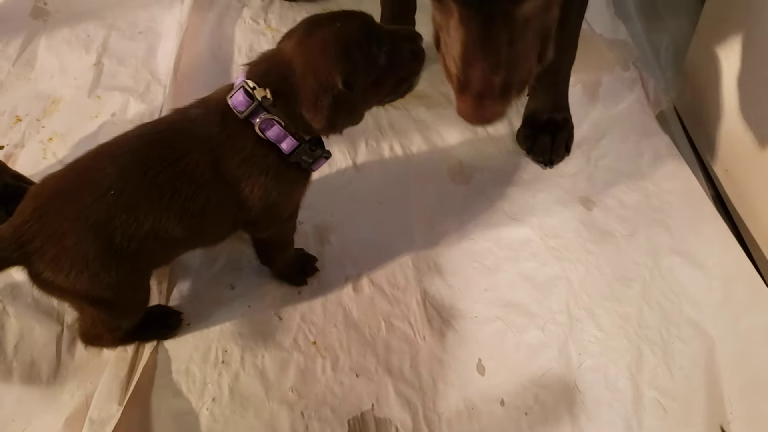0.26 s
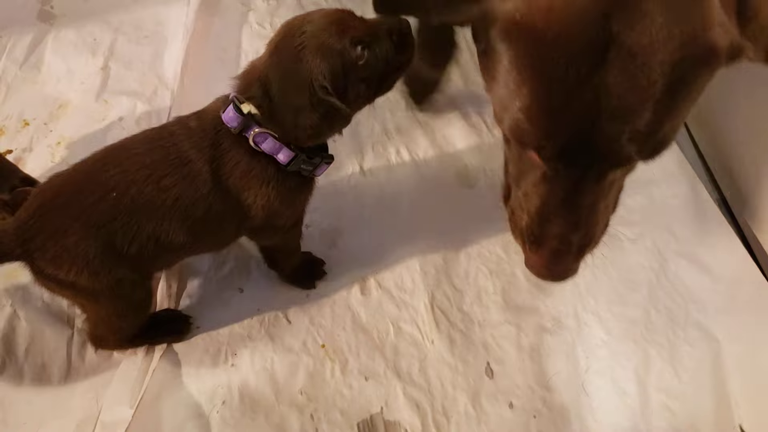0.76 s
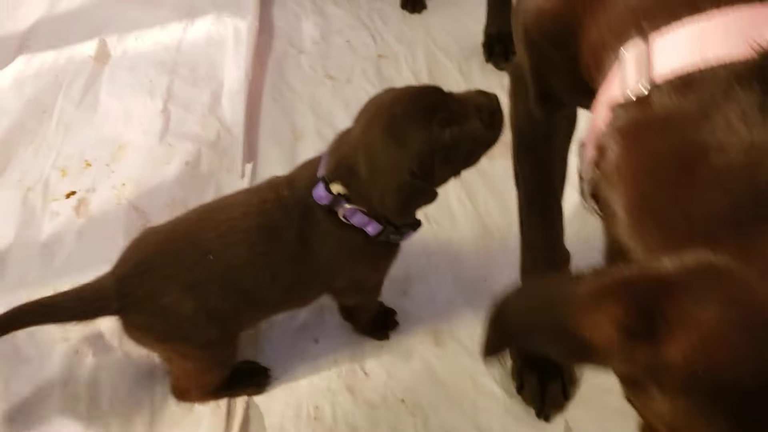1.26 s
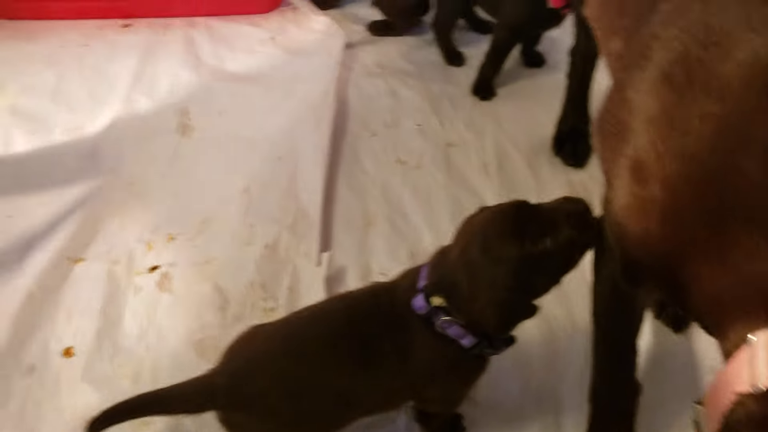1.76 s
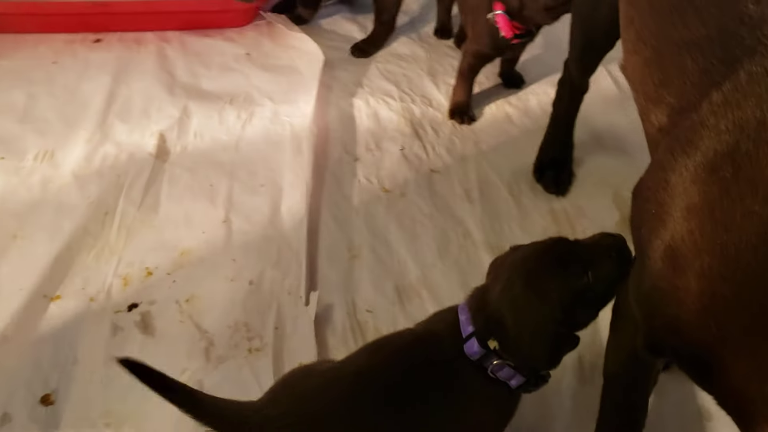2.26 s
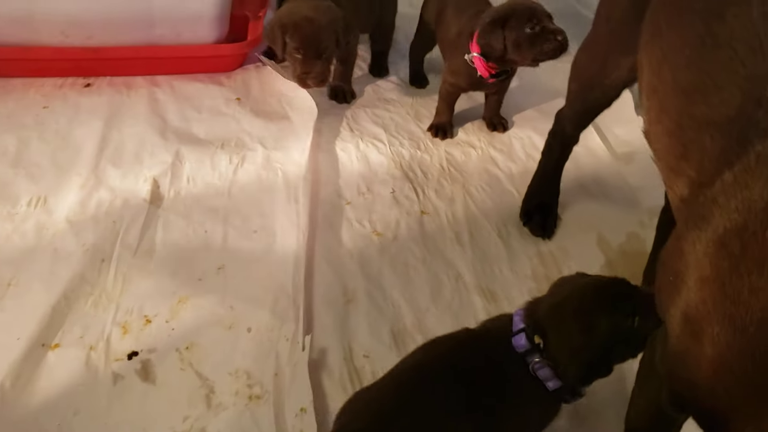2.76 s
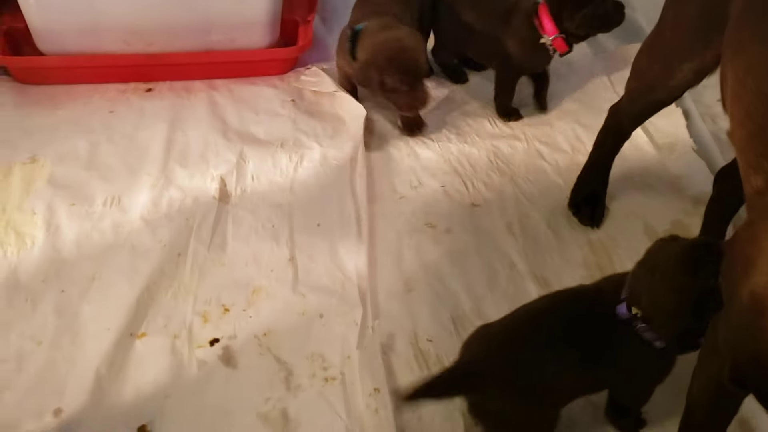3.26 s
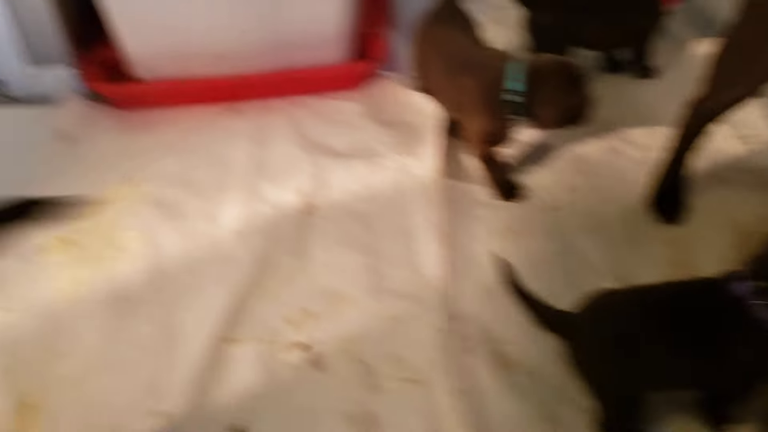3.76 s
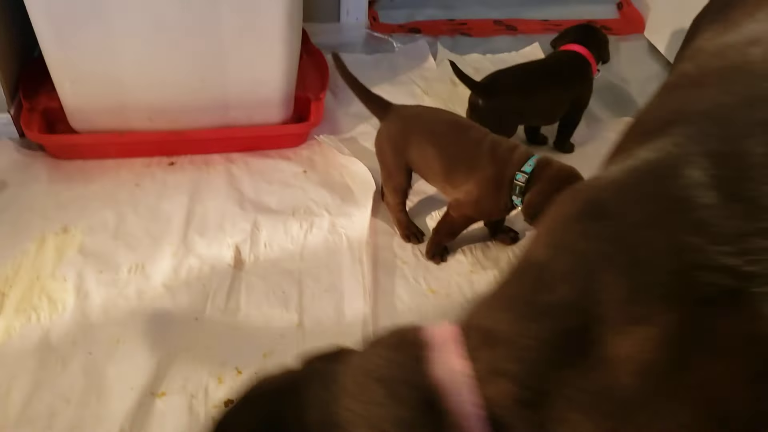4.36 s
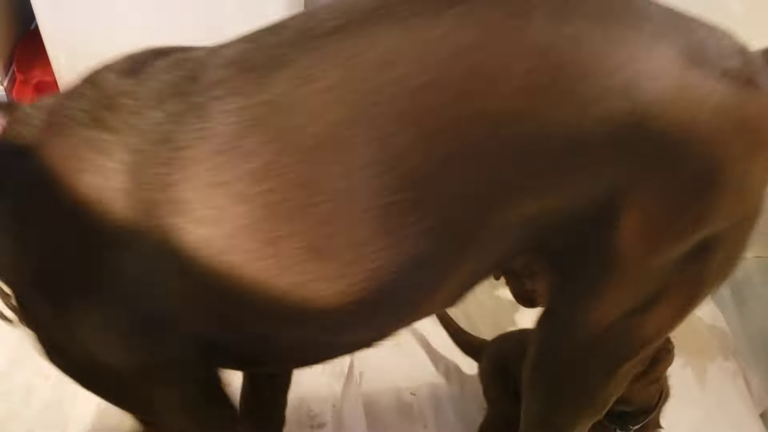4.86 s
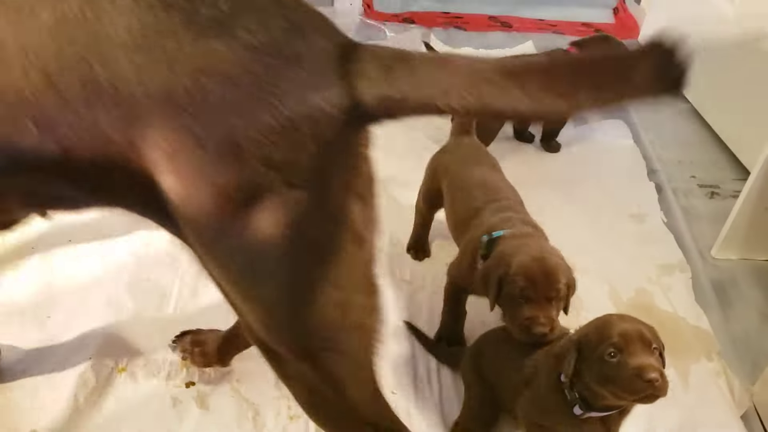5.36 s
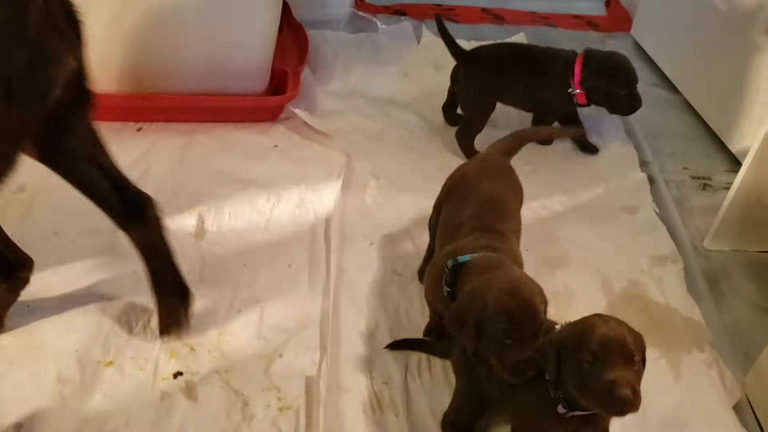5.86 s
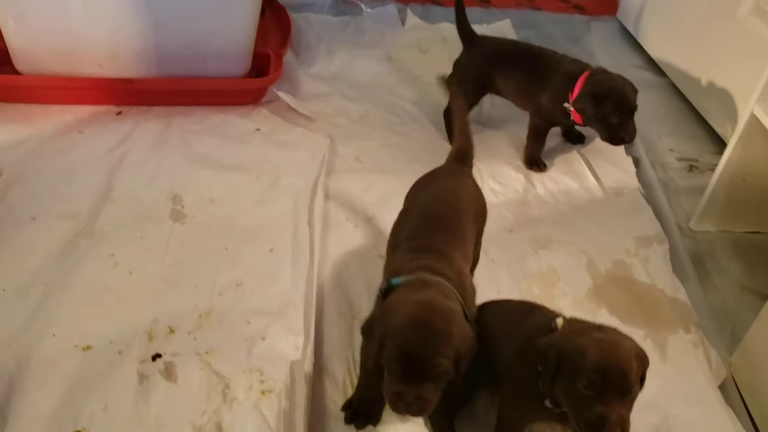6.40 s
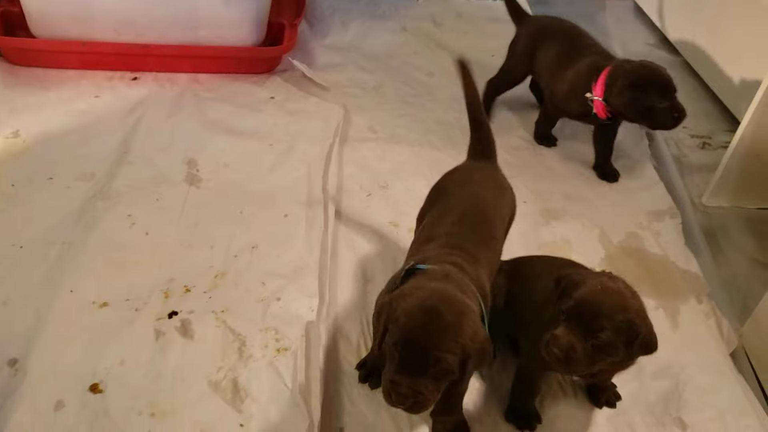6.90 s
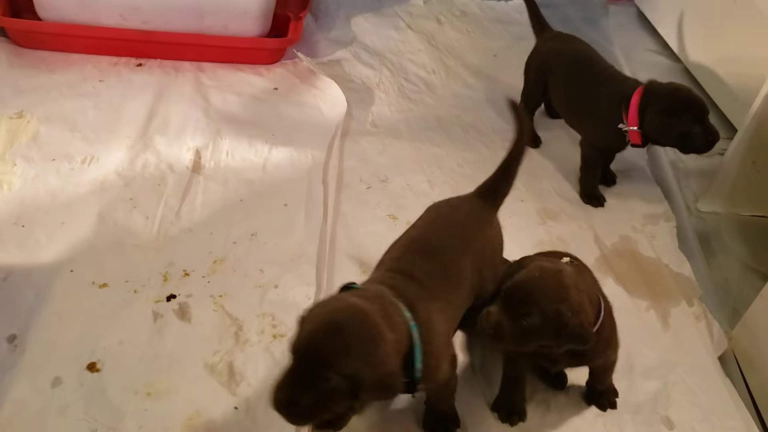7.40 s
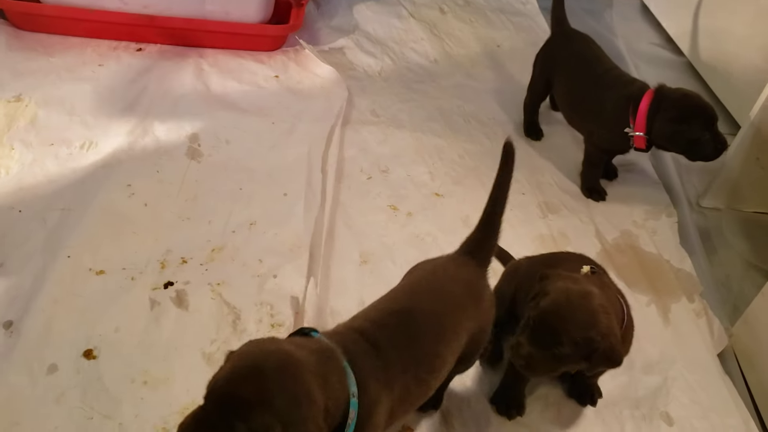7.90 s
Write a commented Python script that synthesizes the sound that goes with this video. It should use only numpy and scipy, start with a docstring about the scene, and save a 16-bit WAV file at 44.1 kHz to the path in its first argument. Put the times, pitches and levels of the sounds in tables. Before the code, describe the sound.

A dog and her puppies shuffle about on paper sheets in a small room, heard from close above. Their paws patter and slide in uneven bursts of crackle, with sharp crease snaps and soft floor thuds. The pups give a few faint, brief squeaks. Fingers bump the hand-held microphone on the right around the middle and again near the end, over faint hiss and low rumble.

```python
"""A small room, where a dog and her puppies shuffle about on paper sheets, heard from close above.
Under their paws the paper buckles into dense crackle, single creases snap and ring, hollow spots
resonate and the floor thuds softly. The pups give a few faint squeaks. Fingers bump a hand-held
phone near its right microphone. Short reverberation, faint hiss and a low rumble lie behind."""
import sys
import numpy as np
from scipy import signal
from scipy.fft import rfft, irfft, next_fast_len
from scipy.io import wavfile

SR = 44100
rng = np.random.default_rng(int(sys.argv[2]) if len(sys.argv) > 2 else 0)


def generate_wav(signal):
    """Clip the signal to [-1, 1] and save it as 16-bit WAV at the path in sys.argv[1]."""
    frames = np.transpose(np.atleast_2d(signal))
    scaled = np.clip(frames, -1, 1) * 32767
    pcm = np.round(scaled).astype(np.int16)
    wavfile.write(sys.argv[1], SR, pcm)


N = 358974
T = np.arange(N) / SR
TOP_HZ = 16050  # upper band limit


# Spectrum of crackling paper: f/Hz, level/dB
PAPER_SPECTRUM = [(200, -19.5), (700, -20.5), (1400, -8.5), (2400, -0.5), (4200, 0), (6800, -3),
                  (8800, -10), (10500, -5), (12500, -2), (16000, -10)]
# Spectrum of a rubbing pad: f/Hz, level/dB
PAD_SPECTRUM = [(80, -6), (200, -3), (680, -1), (1300, 1.5), (2200, -1.5), (4000, -13.5), (9000, -19.5)]
def paws(rub_db=3.0, crush_db=-38.5, fine_hz=7500):
    """Buckling and friction: a sliding paw crushes many creases at once while its pad rubs the floor."""
    pressure, rub, fine = treading()
    crush = pressure / np.hypot(pressure, undb(crush_db))  # above crush_db the crackle turns dense
    lowpass, highpass = (signal.butter(3, fine_hz, kind, fs=SR, output="sos") for kind in ("low", "high"))
    coarse_creases = signal.sosfilt(lowpass, pressure * creases(crush))
    fine_creases = signal.sosfilt(highpass, fine * creases(crush))
    paper = colour(coarse_creases + fine_creases, PAPER_SPECTRUM)
    pads = unit(colour(crackle(per_s=1000, spread_db=3.0, decay_s=0.0062), PAD_SPECTRUM))
    return patchy(paper + undb(rub_db) * rub * pads)


# Paws landing and sliding: t/s, rise/s, slide/s, crackle/dB, rub/dB re crackle, treble/dB re crackle
PAW_STEPS = [(0.0, 0.00042, 0.0025, -38, -11, -4), (0.395, 0.0039, 0.039, -44.5, -32, 1),
             (0.549, 0.0052, 0.021, -46, -37, 4.5), (0.7502, 0.012, 0.022, -29, -22, -2),
             (1.028, 0.01, 0.015, -30, -17.5, -1.5), (1.219, .003, 0.026, -48.5, -10.5, 6),
             (1.408, 0.016, 0.029, -43, -6, 3.5), (1.506, 0.048, 0.02, -32, -10.5, -3),
             (1.94, 0.051, 0.008, -35, -17.5, 2.5), (2.018, 0.0037, 0.025, -40, -9, -3),
             (2.221, 0.0069, 0.037, -43, -15.5, -2), (2.266, 0.0045, 0.041, -41.5, -10.5, -4),
             (2.346, 0.0039, 0.023, -40.5, -9.5, 3.5), (2.465, .003, 0.044, -45.5, -15, 0.5),
             (2.753, 0.048, 0.014, -39, -9, 1), (2.924, 0.014, 0.012, -41, -10.5, 5),
             (3.111, 0.0015, 0.004, -41, -14, 2.5), (3.27, .008, 0.023, -45.5, -11, 2),
             (3.33, 0.038, 0.08, -45, -8, 3), (3.537, 0.04, 0.023, -33, -10, 3.5),
             (3.872, 0.00092, 0.0064, -45, 0, -14), (4.125, 0.051, 0.057, -41.5, -7, 0.5),
             (4.563, 0.019, 0.071, -40.5, -7.5, 1), (4.677, 0.0047, 0.024, -32, -12.5, -6),
             (4.818, 0.0043, 0.016, -41.5, -12, 2.5), (5.005, 0.012, 0.018, -46, -1, 3),
             (5.087, 0.0042, 0.013, -46.5, -8, 3), (5.195, 0.006, 0.013, -45, -9.5, -1),
             (5.343, 0.029, 0.039, -30.5, -13.5, -3), (5.409, 0.0092, 0.0058, -24, -11, -1),
             (5.549, 0.014, 0.019, -37.5, -10.5, 0.5), (5.6877, .001, 0.0054, -33, -23, -5),
             (5.762, 0.02, 0.027, -43, -8, 1), (5.928, 0.0042, 0.077, -44.5, -11, -11),
             (6.054, 0.014, 0.027, -40.5, -7.5, -3), (6.135, 0.0075, 0.017, -47, -0.5, -2),
             (6.251, 0.003, 0.076, -40.5, -9, 3), (6.368, 0.0056, 0.041, -35, -10, 0),
             (6.433, 0.019, .008, -34.5, -10.5, 0.5), (6.65, 0.0007, 0.0044, -36.5, -3.5, -2),
             (6.666, 0.0045, 0.038, -34.5, -9.5, -2.5), (6.755, 0.038, 0.095, -44, -6.5, 3),
             (6.993, .002, 0.019, -44, -3.5, 8.5), (7.106, 0.026, .11, -43, -6, -3),
             (7.339, 0.003, 0.028, -37.5, -10.5, -12), (7.592, 0.013, 0.091, -43.5, -9, -4.5),
             (7.678, 0.076, 0.047, -35.5, -9, -4), (8.037, .01, 0.062, -39.5, -7.5, -7)]
# Rustle of the litter fidgeting between steps: t/s, level/dB
FIDGET_LEVELS = [(0, -55), (.35, -60), (.47, -50), (.63, -60.5), (.69, -51.5), (.9, -47), (1.12, -48.5),
                 (1.29, -57), (1.72, -52.5), (2.18, -58.5), (2.72, -47.5), (3.0, -43.5), (3.16, -57),
                 (3.22, -53), (4.3, -46), (4.52, -53), (4.8, -45.5), (5.24, -48), (5.31, -54.5), (5.5, -47),
                 (6.62, -52.5), (7.28, -44.5), (7.41, -53), (7.96, -54), (8.02, -41.5)]
def treading(fidget_rub_db=-9.5, fidget_fine_db=-0.5, flicker_db=3):
    """Incoherent sources add in power: steps and fidgeting set the crackle, rub and treble amplitudes."""
    fidget = undb(curve(FIDGET_LEVELS) + flicker_db * wander(per_s=30))
    power = np.outer(undb([0, fidget_rub_db, fidget_fine_db]), fidget) ** 2
    for s, rise_s, slide_s, db, rub_db, fine_db in PAW_STEPS:
        envelope = undb(db) * step(rise_s, slide_s)
        add(power, s, np.outer(undb([0, rub_db, fine_db]), envelope) ** 2)
    return np.sqrt(power)


def step(rise_s, slide_s, release_s=0.013, settle_s=0.19, settle_db=-21.5):
    """Two-stage decay: crackle dies fast once the paw stops, but a little lingers as the sheet settles."""
    t = T[:SR]
    stopped = np.maximum(t - rise_s - slide_s, 0)
    lingering = undb(settle_db)
    fade = (1 - lingering) * np.exp(-stopped / release_s) + lingering * np.exp(-stopped / settle_s)
    return np.sin(np.pi / 2 * np.minimum(t / rise_s, 1)) * fade


def creases(crush, crinkle_db=-5.5):
    """Buckling rate grows with load: sparse with lone crinkles at crush 0, dense at crush 1."""
    crinkles = undb(crinkle_db) * crackle(per_s=70, spread_db=3.5, decay_s=.003)
    sparse = crackle(per_s=1500, spread_db=3.8, decay_s=.0014)
    dense = crackle(per_s=5000, spread_db=2.7, decay_s=.001)
    return np.sqrt(1 - crush ** 2) * (crinkles + sparse) + crush * dense


def crackle(per_s, spread_db, decay_s):
    """Shot noise: tiny bucklings of very uneven size arrive at random, each a short puff; rms 1."""
    sizes = undb(spread_db * np.minimum(rng.standard_exponential(N), 4))
    clicks = (rng.random(N) < per_s / SR) * sizes
    energy = signal.lfilter([1], [1, -np.exp(-2 / (decay_s * SR))], clicks ** 2)
    return unit(np.sqrt(energy) * stereo_noise())


def patchy(x, depth_db=1.5, per_s=25, count=26):
    """Size sets resonance: each new patch under a paw differs, so narrow bands swell independently."""
    size = next_fast_len(N, real=True)
    f = np.fft.rfftfreq(size, 1 / SR)
    band_index = np.interp(np.log(f + 1), np.log([300, 16000]), [0, count - 1])
    spectrum = rfft(x, size)
    triangles = (np.maximum(1 - np.abs(band_index - k), 0) for k in range(count))
    bands = (irfft(spectrum * triangle, size)[:, :N] for triangle in triangles)
    return sum(band * undb(depth_db * wander(per_s)) for band in bands)


# Single creases snapping and claws ticking: t/s, level/dB, ring f/Hz
CREASE_SNAPS = [(0.297, -36, 4600), (0.3948, -27, 10300), (0.5649, -31.5, 5260), (1.106, -26, 5130),
                (1.1418, -27.5, 12200), (1.226, -32.5, 12350), (1.438, -29, 4380), (1.9375, -29, 12700),
                (2.2227, -23, 10750), (2.2695, -28, 2980), (2.291, -26, 4650), (2.47, -28, 4870),
                (2.595, -27.5, 12100), (2.658, -30.5, 6850), (2.851, -22.5, 11500), (3.006, -46, 4800),
                (3.0519, -20, 11800), (3.19, -21, 4500), (3.282, -29, 11800), (3.547, -21.5, 12100),
                (3.873, -24, 2300), (4.0097, -26, 4600), (4.685, -21, 3430), (5.3698, -19, 3080),
                (5.703, -31, 4900), (6.255, -27, 4970), (6.378, -24.5, 12200), (6.672, -19.5, 12870),
                (6.845, -26, 11800), (7.000, -27, 6000), (7.185, -26.5, 13000), (7.239, -31, 4540),
                (7.2754, -17.5, 11000), (7.51, -30.5, 4070), (7.681, -30, 5000), (7.7, -19, 13600),
                (7.742, -23, 4000), (7.885, -35.5, 4500), (7.9793, -30, 4330)]
# Spectrum of the crack: f/Hz, level/dB
CRACK_SPECTRUM = [(200, -23), (2000, -7), (6500, -5), (8800, -11.5), (12000, -3), (16000, -6)]
def snaps(rise_s=.0003, crack_s=.0025, flap_s=.008, flap_db=-13, ring_db=-7, decay_cycles=5):
    """Snap-through: a crease flips, cracks, flaps and rings; larger patches ring lower and longer."""
    out = np.zeros((2, N))
    for s, db, hz in CREASE_SNAPS:
        crack = unit(colour(burst(crack_s) + undb(flap_db) * burst(flap_s), CRACK_SPECTRUM))
        t = T[:crack.shape[1]]
        phase = 2 * np.pi * (hz * t + rng.random((2, 1)))
        ring = unit(np.sin(phase) * np.exp(-t * hz / decay_cycles))
        snap = (crack + undb(ring_db) * ring) * np.minimum(t / rise_s, 1)
        onset_size = 1.75 * np.sqrt(np.mean(snap[:, t < .002] ** 2))
        add(out, s, undb(db) * snap / onset_size)
    return out


# Paws patting hollow spots of the sheet: t/s, level/dB, resonance f/Hz
HOLLOW_TAPS = [(0.147, -41, 2140), (1.435, -34, 1070), (3.809, -33, 2940), (4.183, -36.5, 1180),
               (4.243, -32.5, 1230), (4.877, -29, 2030), (4.915, -30.5, 2190), (5.02, -35, 1180),
               (6.65, -35, 1300), (7.0, -34.5, 3130)]
def taps(pat_s=0.005, skirt_db=-13, edge_db=-22, width=1.32):
    """Damped resonance: a pat where the sheet arches off the floor excites one broad, hollow peak."""
    out = np.zeros((2, N))
    for s, db, hz in HOLLOW_TAPS:
        peak = [(hz / width, skirt_db), (hz, 0), (hz * width, skirt_db)]
        hollow = [(hz / 10, edge_db), *peak, (TOP_HZ, edge_db)]
        add(out, s, undb(db) * colour(burst(pat_s, size=2048), hollow))
    return out


# Puppy squeaks and grunts: t/s, length/s, start f/Hz, end f/Hz, level/dB, roughness (0 = smooth)
PUPPY_CALLS = [(1.725, 0.033, 1040, 277, -47, 1.11), (2.094, 0.016, 892, 890, -39.5, 0.54),
               (2.108, 0.064, 907, 897, -48, 0.37), (4.336, 0.073, 224.4, 197, -37.5, 0.2),
               (4.38, 0.18, 590, 800, -44, 0.4), (4.4, 0.034, 630, 683, -36.5, 0),
               (4.441, 0.18, 402, 463, -48.5, 0.5), (5.299, 0.025, 750, 775, -45, 0),
               (5.318, 0.05, 793, 840, -53, 0.1)]
def squeaks(waver=0.024, overtone_db=-22, flutter_per_s=450):
    """Random modulation: fast flutter makes the unsteady glide of a closed-mouth squeak hoarse."""
    out = np.zeros(N)
    for s, length_s, start_hz, end_hz, db, rough in PUPPY_CALLS:
        progress = np.linspace(0, 1, int(length_s * SR))
        wobble = np.interp(progress, np.linspace(0, 1, 10), rng.standard_normal(10))
        pitch_hz = start_hz * (end_hz / start_hz) ** progress * (1 + waver * wobble)
        phase = 2 * np.pi * np.cumsum(pitch_hz) / SR
        kicks = rng.standard_normal(size=(100, 2)) @ np.array([1, 1j])  # random in amplitude and phase
        flutter = np.interp(progress * length_s * flutter_per_s, np.arange(len(kicks)), kicks)
        tone = np.exp(1j * phase) + undb(overtone_db) * np.exp(2j * phase)
        voice = (tone * (1 - rough + rough * flutter)).imag
        add(out, s, undb(db) * np.sin(np.pi * progress ** 0.37) * voice)
    return np.array([out, out])


# Weight coming down on the floor: t/s, level/dB
FLOOR_LOADS = [(.005, -53), (.485, -53.5), (.765, -46), (1.036, -43.5), (1.14, -49), (2.343, -46.5),
               (2.59, -53.5), (4.69, -47.5), (4.86, -49.5), (6.39, -44.5), (6.863, -50.5), (6.996, -49.5),
               (7.83, -56.5)]
# Spectrum of the floor's thud: f/Hz, level/dB
FLOOR_SPECTRUM = [(40, -35), (80, -4), (130, 4), (210, 3), (330, -15), (1500, -28.5)]
def footfalls(swell_s=0.018):
    """Soft impact: a pad loads the floor gradually, so only a dull thud comes out."""
    load, u = np.zeros(N), T[:SR // 4] / swell_s
    for s, db in FLOOR_LOADS:
        add(load, s, undb(db) * u * np.exp(1 - u))
    return load * unit(colour(stereo_noise(), FLOOR_SPECTRUM))


# Fingers on the phone: t/s, thump level/dB, thump f/Hz, swell/s, click level/dB, click f/Hz
FINGER_BUMPS = [(3.756, -18, 54, 0.0028, -56, 176), (3.82, -18, 62.6, 0.015, -84, 150),
                (3.894, -16.5, 63.5, 0.0042, -23, 222), (4.0648, -16.5, 77, .001, -3, 286),
                (7.136, -3, 63, 0.026, -50, 250), (7.1708, -47, 70, .002, -20, 430)]
def bumps(thump_s=0.0083, click_s=0.00077, left_db=-22):
    """Handling noise: a fingertip clicks on the case and pushes a pressure swing into the right port."""
    out, t = np.zeros(N), T[:SR // 5]
    for s, thump_db, thump_hz, swell_s, click_db, click_hz in FINGER_BUMPS:
        thump = np.sin(2 * np.pi * thump_hz * t) * np.minimum(t / swell_s, 1) * np.exp(-t / thump_s)
        click = np.sin(2 * np.pi * click_hz * t) * np.exp(-t / click_s)
        add(out, s, undb(thump_db) * thump + undb(click_db) * click)
    return np.array([undb(left_db) * out, out])


def room(x, t60_s=0.28, treble_t60_s=0.12, wet_db=-6, size=2048):
    """Reverberation: near walls return a tail whose treble dies first; it varies as dogs and phone move."""
    t, wet = T[:SR // 4], np.zeros_like(x)
    noise = stereo_noise()
    low = signal.sosfilt(signal.butter(1, 4000, fs=SR, output="sos"), noise)
    high = noise - low
    window = np.sqrt(np.hanning(size))
    slow, fast = (undb(-60 * t / t60) * (t > .003) for t60 in (t60_s, treble_t60_s))
    for i in range(0, N - size, size // 2):
        start = rng.integers(N - len(t))  # a new reflection pattern for each block
        part = slice(start, start + len(t))
        tail = low[:, part] * slow + high[:, part] * fast
        tail /= np.linalg.norm(tail, axis=1, keepdims=True)
        add(wet, i / SR, signal.fftconvolve(x[:, i:i + size] * window, tail, axes=1))
    return x + undb(wet_db) * wet


# Spectrum of the room air: f/Hz, level/dB
AIR_SPECTRUM = [(500, -32), (4400, -1), (8800, -6), (12300, 4), (16000, 3)]
# Spectrum of the rumble of floor and held phone: f/Hz, level/dB
RUMBLE_SPECTRUM = [(20, -14), (52, -2.5), (140, -15.5), (260, -26.5), (800, -81)]
# Course of that rumble: t/s, level/dB
RUMBLE_LEVELS = [(0, -58), (.7, -61.5), (1.1, -53), (1.6, -56), (2.4, -53.5), (2.8, -60), (4.0, -48.5),
                 (5.0, -64), (7.0, -56)]
def background(air_db=-58.0):
    """Noise floor: quiet room air and a low rumble that swells as the big dog shifts her weight."""
    air = unit(colour(stereo_noise(), AIR_SPECTRUM))
    rumble = unit(colour(stereo_noise(), RUMBLE_SPECTRUM))
    return undb(air_db) * air + undb(curve(RUMBLE_LEVELS)) * rumble


# Port balance, more bass on the right and more treble on the left: f/Hz, left minus right level/dB
PORT_DIFFERENCE = [(130, -5), (380, 5.5), (650, 4), (1500, 3.5), (3200, 5), (5800, 2.5), (8000, 14.5),
                   (12000, -1.5), (15500, 17)]
def port_responses(x):
    """Frequency response: each microphone port colours the sound its own way, at constant summed power."""
    f = np.maximum(np.fft.rfftfreq(N, 1 / SR), 1)
    gains = panned(spectrum_db(f, PORT_DIFFERENCE))
    return irfft(rfft(x) * gains / np.sqrt(np.mean(gains ** 2, axis=0)), N)


def two_ports(x, coherent_hz=800):
    """Spatial coherence: two close microphones share long waves and hear short ones differently."""
    f = np.fft.rfftfreq(x.shape[-1], 1 / SR)
    coherence = .8 * np.exp(-(f / coherent_hz) ** 2)
    mid, side = rfft(x) * np.sqrt([1 + coherence, 1 - coherence])
    return irfft(np.array([mid + side, mid - side]), x.shape[-1]) / np.sqrt(2)


def stereo_noise():
    """Diffuse field: white noise at both microphones."""
    return two_ports(rng.standard_normal((2, N)))


def burst(decay_s, size=1024):
    """Exponential damping: a patch of paper flaps briefly, heard at both microphones."""
    return two_ports(rng.standard_normal((2, size)) * np.exp(-np.arange(size) / SR / decay_s))


def colour(x, points, size=4096):
    """Minimum-phase filter of unit power through (f/Hz, level/dB) points."""
    f = np.maximum(np.fft.rfftfreq(size, 1 / SR), 1)
    cepstrum = irfft(np.log(undb(spectrum_db(f, points))))
    cepstrum[1:size // 2] *= 2  # folding onto positive time makes the filter causal
    cepstrum[size // 2 + 1:] = 0
    response = irfft(np.exp(rfft(cepstrum)))
    return signal.oaconvolve(x, response[None] / np.linalg.norm(response))[:, :x.shape[-1]]


def spectrum_db(f, points):
    """Interpolation of (f/Hz, level/dB) points over log frequency."""
    hz, db = np.transpose(points)
    return np.interp(np.log(f), np.log(hz), db)


def curve(points):
    """Linear interpolation of (t/s, level/dB) points at every sample."""
    return np.interp(T, *np.transpose(points))


def wander(per_s):
    """Interpolated noise: a slow random drift with a spread near 1."""
    return np.interp(T * per_s, np.arange(1000), rng.standard_normal(1000))


def undb(db):
    """Amplitude ratio for a level in decibels."""
    return 10 ** (np.asarray(db) / 20)


def unit(x):
    """Normalisation to rms 1."""
    return x / np.sqrt(np.mean(x ** 2))


def panned(db):
    """Amplitude panning: left and right gains for a level difference."""
    return undb(np.array([[.5], [-.5]]) * db)


def add(out, s, x):
    """Superposition of a short signal at time s."""
    i = int(s * SR)
    out[..., i:i + x.shape[-1]] += x[..., :N - i]


def scene():
    """Transmission paths: the dogs sound through the room; the bumps reach the microphones directly."""
    dogs = paws() + snaps() * panned(db=0.5) + taps() + squeaks() + footfalls()
    return port_responses(room(dogs) + background()) + bumps()


def record(dry):
    """Band limiting: the phone cuts the deepest bass and the top of the treble."""
    thinned = signal.sosfilt(signal.butter(2, 38, "high", fs=SR, output="sos"), dry)
    return signal.sosfilt(signal.ellip(10, .2, 70, TOP_HZ, fs=SR, output="sos"), thinned)


dry = scene()
out = record(dry)
generate_wav(out)
```